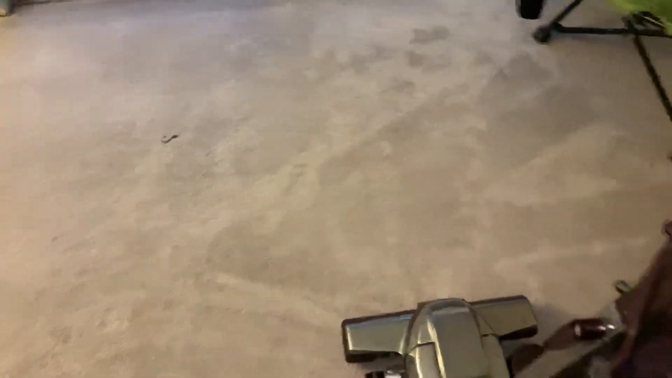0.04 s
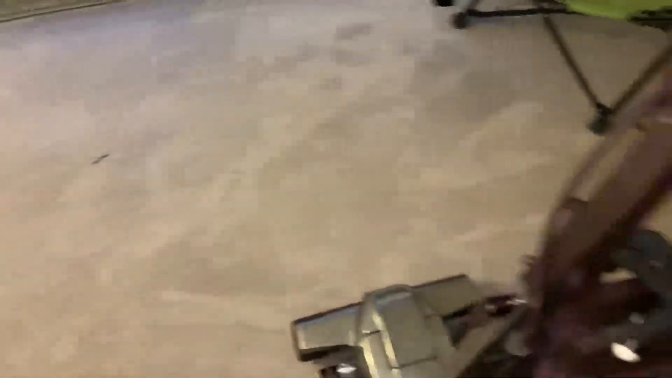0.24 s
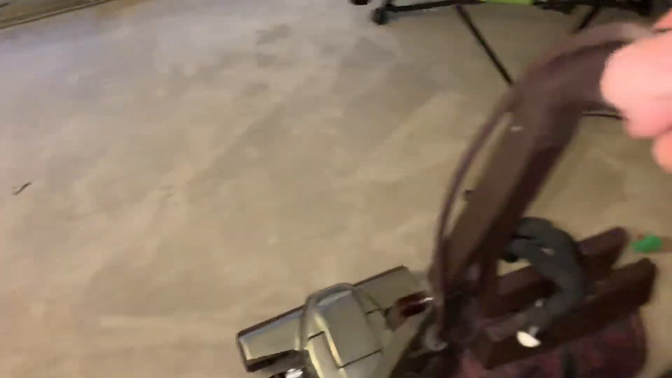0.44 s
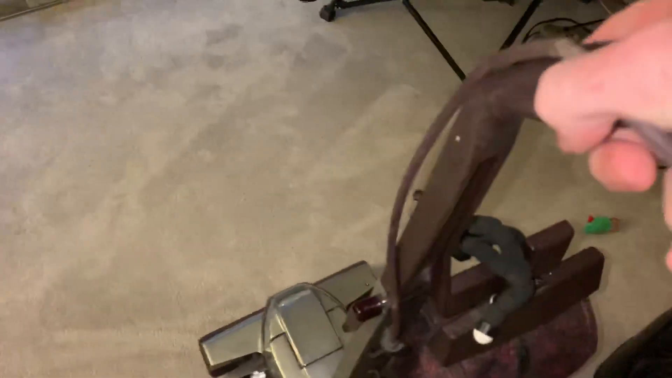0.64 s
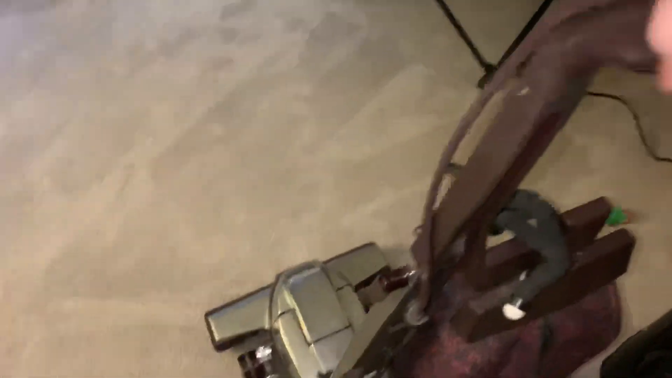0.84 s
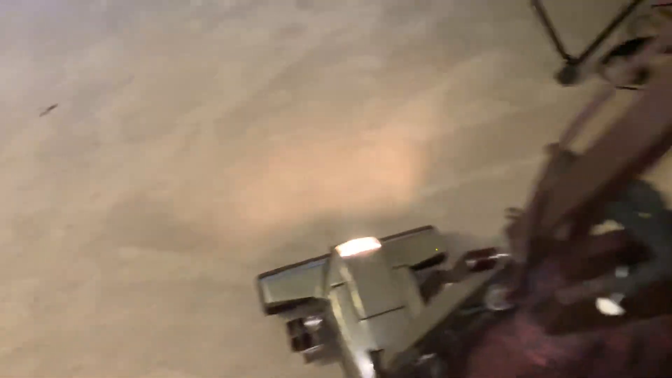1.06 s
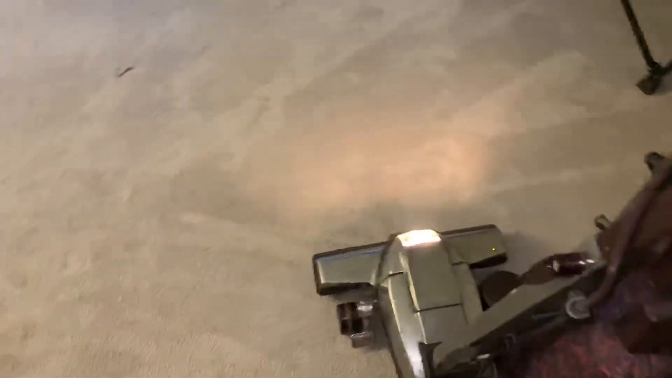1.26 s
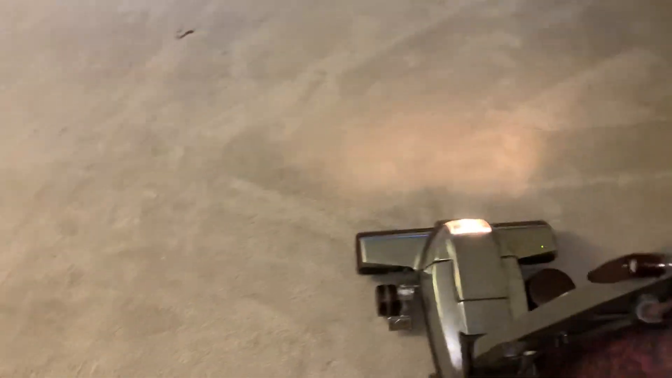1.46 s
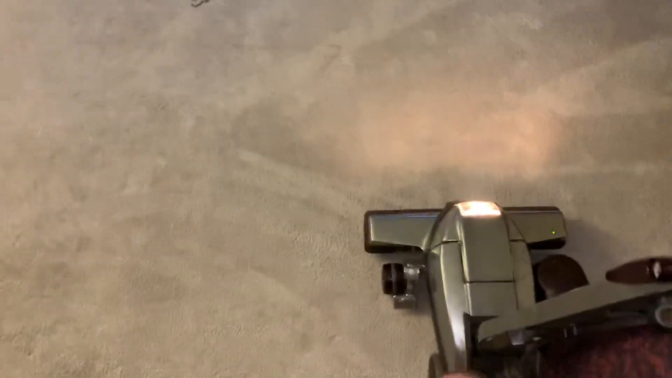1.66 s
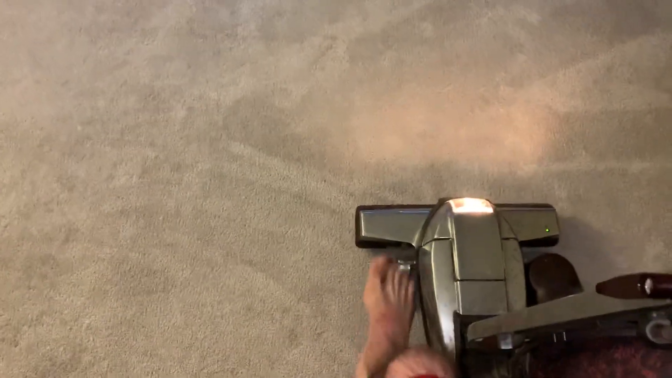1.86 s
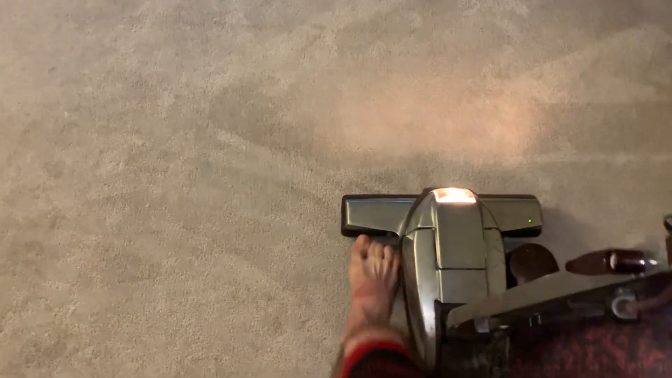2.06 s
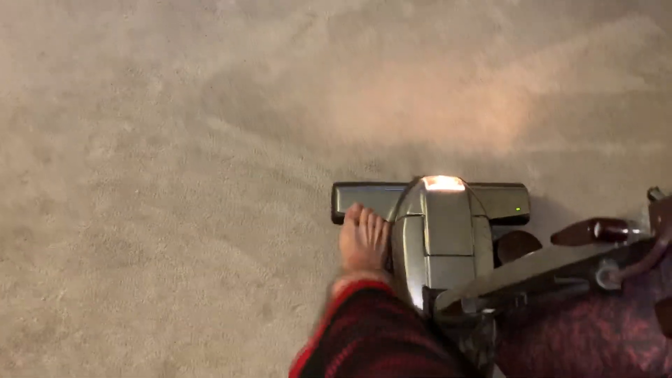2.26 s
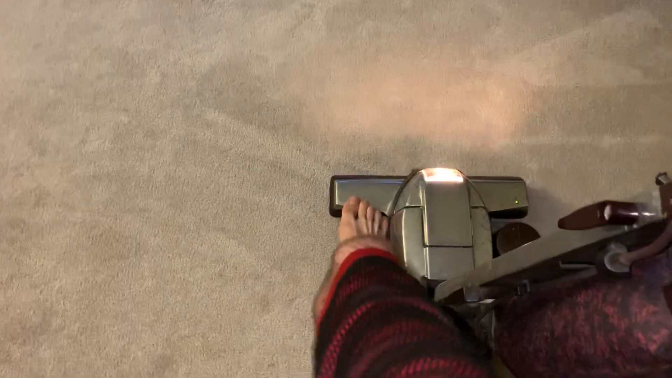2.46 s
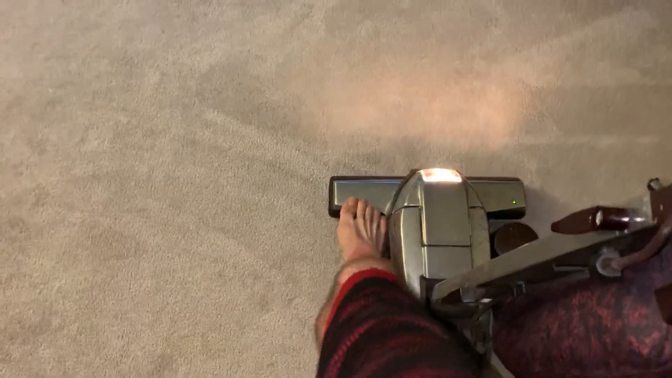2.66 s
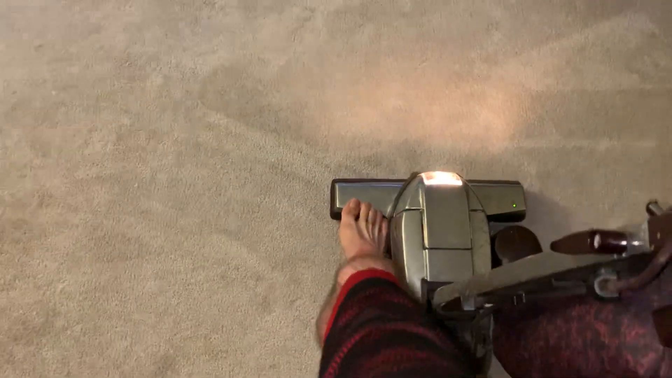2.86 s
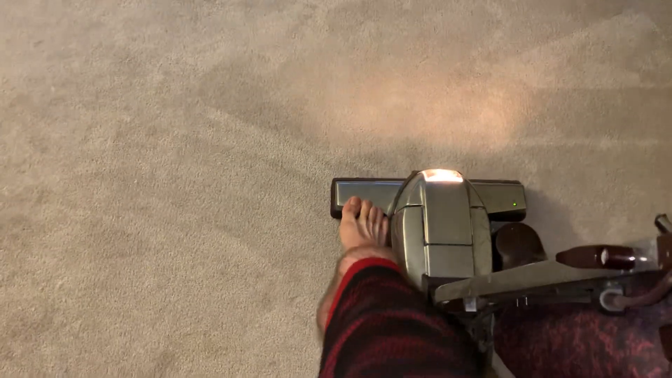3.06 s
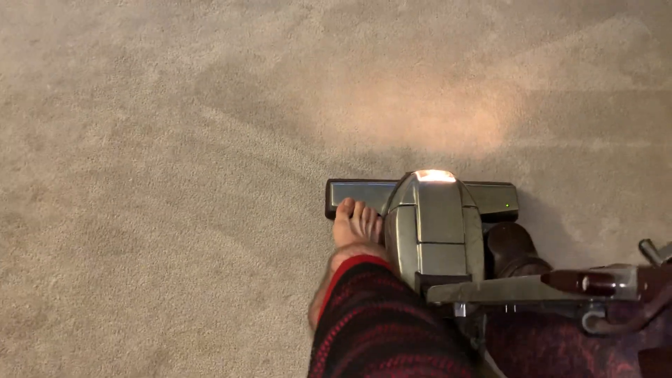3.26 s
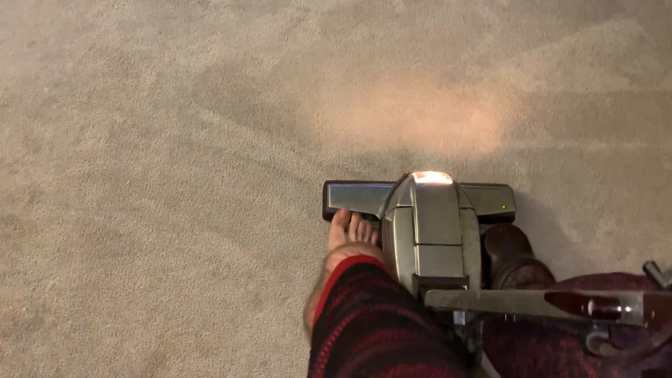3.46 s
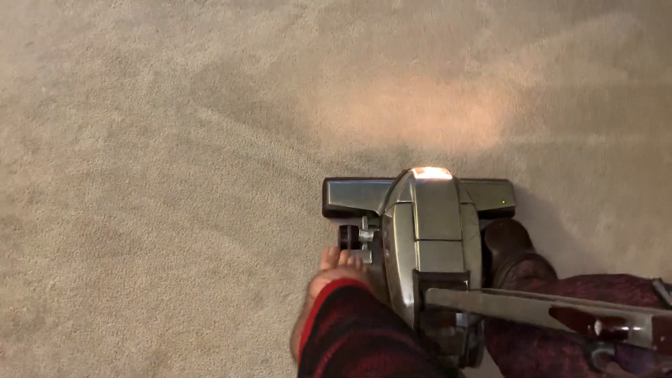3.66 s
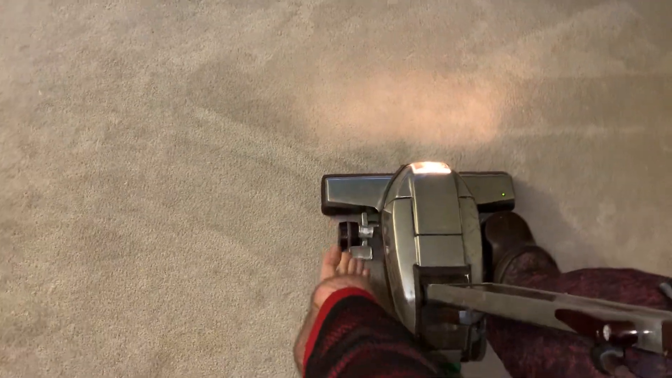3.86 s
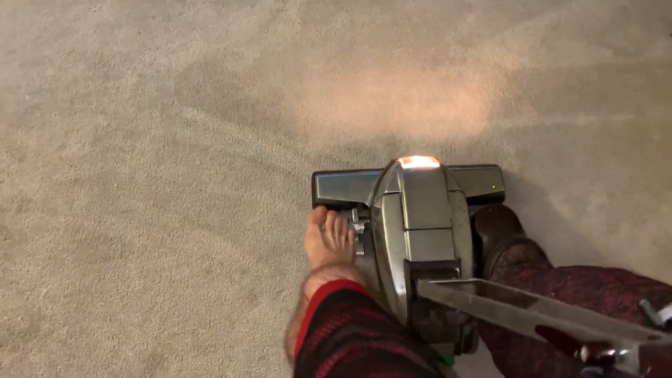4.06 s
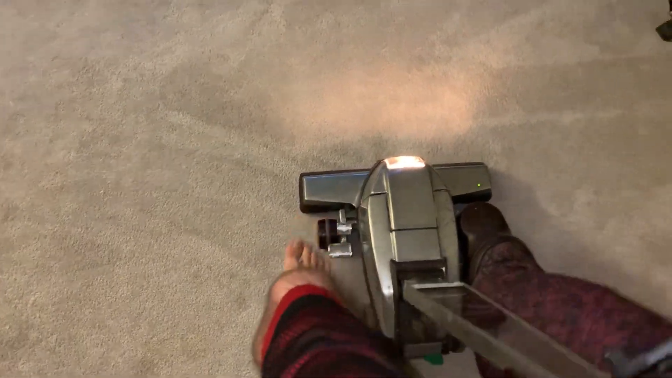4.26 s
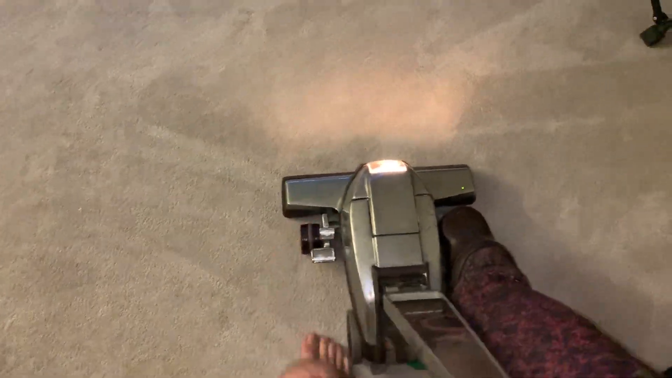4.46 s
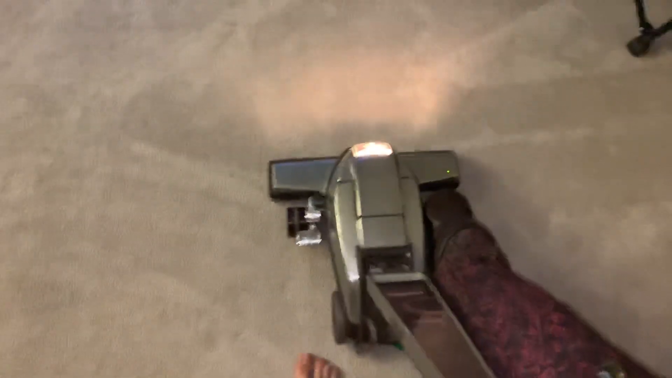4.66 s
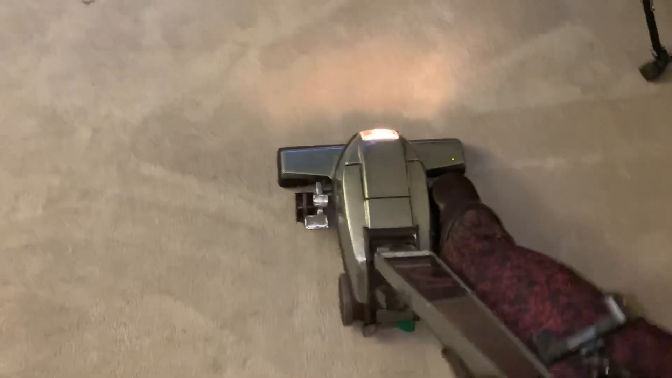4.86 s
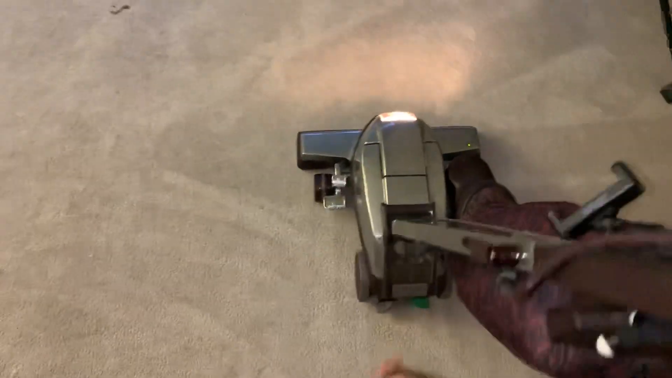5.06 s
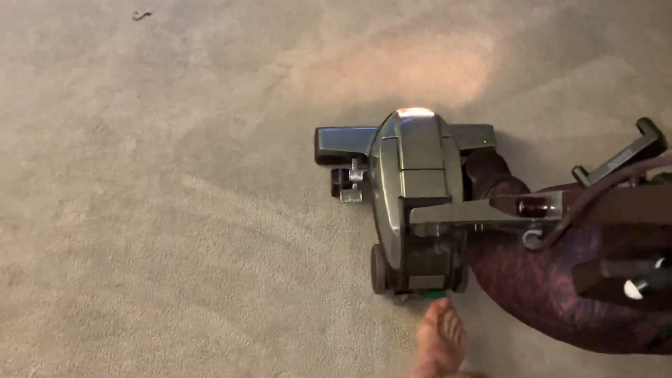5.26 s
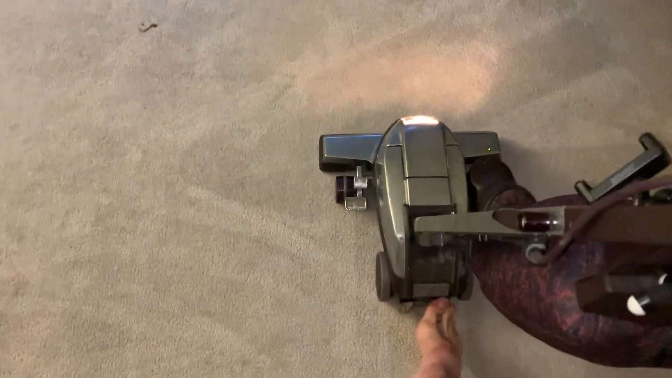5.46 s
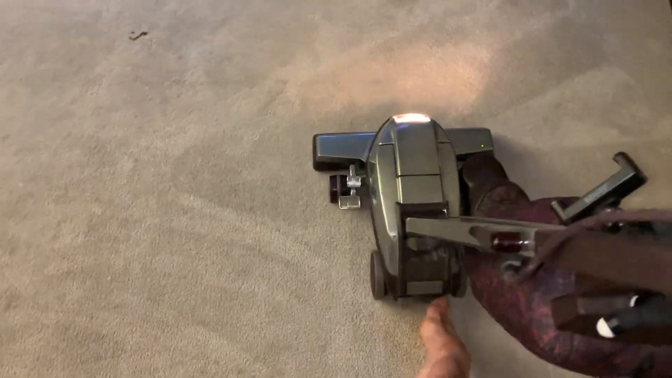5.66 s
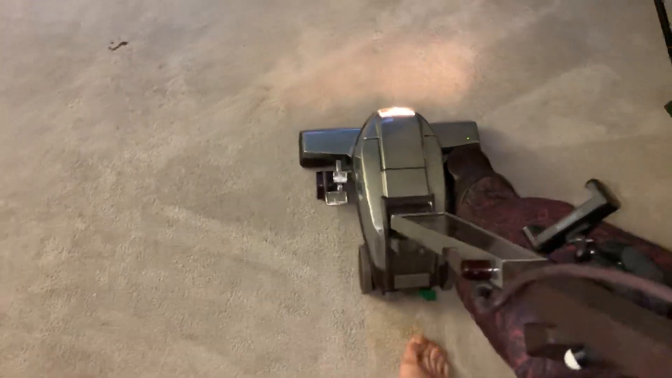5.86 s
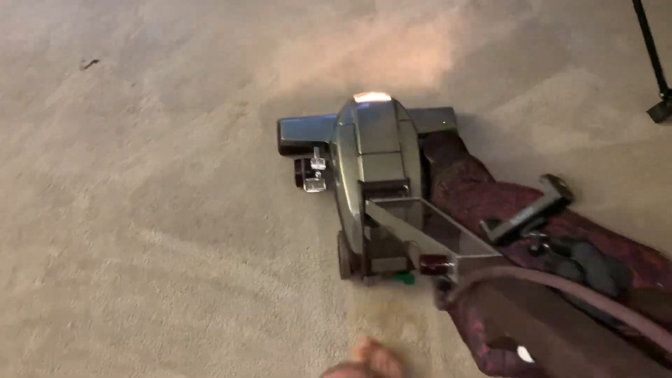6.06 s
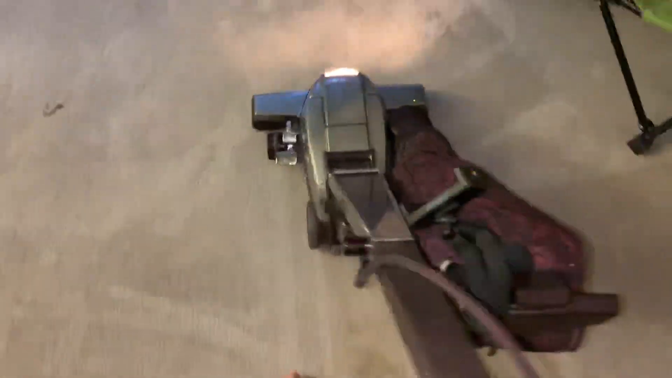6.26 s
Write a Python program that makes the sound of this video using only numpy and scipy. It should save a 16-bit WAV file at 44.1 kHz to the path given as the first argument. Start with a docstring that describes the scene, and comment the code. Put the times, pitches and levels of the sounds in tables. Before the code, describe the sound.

Close stereo sound indoors: gentle handling thuds over faint room rumble, then a switch click and an electric motor rising quickly to speed. Rushing air, fan whine and rough bristle beating blend into a steady roar. A foot makes two clusters of sharp, rattling clacks; the nozzle tips up and the brush roll hums freely, with shorter hums later, another double clack and renewed carpet beating.

```python
"""In a carpeted room, an upright vacuum cleaner is switched on an arm's length from the microphone.
First come soft bumps and a swish of fabric, made from filtered noise. Then the motor spins up: noise makes
the rush of air, sine waves tied to the motor speed make the fan's whine, and bursts of noise make the
belt-driven brush roll beat the carpet. The roll hums freely, as sine waves, while the nozzle is tipped up.
A foot works the pedal and the handle latch, which clack: short noise bursts with ringing plastic."""
import sys
import numpy as np
from scipy import signal
from scipy.fft import rfft, irfft, next_fast_len
from scipy.io import wavfile
from scipy.ndimage import uniform_filter1d

SR = 44100
rng = np.random.default_rng(int(sys.argv[2]) if len(sys.argv) > 2 else 0)


def to_wav(s):
    """Save 16-bit WAV."""
    ch = np.atleast_2d(s).T  # columns
    pcm = np.round(np.clip(ch, -1, 1) * 32767)  # PCM
    wavfile.write(sys.argv[1], SR, pcm.astype(np.int16))


N = 278271
TIME = np.arange(N) / SR  # seconds
FREQ = np.maximum(np.arange(N // 2 + 1) * SR / N, 1)  # Hz, kept above zero for the logarithm

SWITCH_ON_S, SPIN_UP_S = 0.938, .226  # moment of switching on, time constant of the run-up
BLADES, MAINS_HZ = 11, 60  # fan blades, mains frequency

# resonances and dips of the housing and its ducts: (centre [Hz], width [Hz], lift [dB])
HOUSING_MODES = [(175.4, 11.6, 0), (253, 37, -3), (300, 17, 1.5), (337.7, 10.3, -7.5), (470, 22, -3),
                 (499, 15, 5.5), (527, 9.5, 2), (570, 28, 6), (614, 25, -3.5), (679, 35, 3), (749, 27, -6),
                 (786, 39, 6.5), (942, 26, 7.5), (1081, 51, 8.5), (1201, 45, 7.5), (1585, 49, 7.5),
                 (2100, 210, 4), (2510, 90, 4.5)]
# pedal and latch clacks: (time [s], relative peak [dB], body below the treble [dB], crack decay [s],
# rebound delay [s], rebound [dB], floor shudder [dB], ring pitch [Hz], ring [dB], ring decay [s]);
# the body column is added to the peak, so a negative value makes the body weaker
PEDAL_CLACKS = [(2.374, -2, 3, 0.0038, .012, -10, -34, 4400, -17, 0.013),
                (2.4786, -.5, -1.5, 0.0039, 0.014, -11, -47, 8200, -24, 0.018),
                (2.589, -3.5, -1, 0.0052, 0.013, -9, -37, 5390, -19, 0.016),
                (2.982, -5.5, -0.5, .0035, .011, -7, -45, 5160, -12, 0.017),
                (3.015, -11.5, 7.5, .0026, .004, -12, -55, 8200, -18, .008),
                (3.023, -8, -2, 0.0045, .008, -6, -38, 4510, -9, .03),
                (3.1043, -7, 4.5, 0.0033, 0.011, -7, -44, 4850, -26, 0.011),
                (3.183, -15.5, 5, .003, .006, -12, -41, 3530, -12, .01),
                (3.269, -7, 3, .003, .008, -8, -39, 4950, -4.5, 0.011),
                (5.586, -10.5, -2, .0048, .004, -8, -50, 7500, -20, .02),
                (5.589, -8.5, -1, .0026, .0032, -5, -45, 4940, -21, .012)]


def undb(db):
    """Turn decibels into a gain."""
    return 10 ** (np.asarray(db) / 20)


def unit(x):
    """Scale a sound to an average (rms) level of 1."""
    return x / np.sqrt(np.mean(x ** 2))


def curves(table):
    """Draw each column of a time table as a line through its points, sample by sample."""
    seconds, *columns = np.transpose(table)
    return [np.interp(TIME, seconds, column) for column in columns]


def colour(x, points, modes=()):
    """Filter with a broad spectrum and resonant lifts; its response never starts before the sound."""
    hz, db = np.transpose(points)
    db = np.interp(np.log(FREQ), np.log(hz), db)
    for centre, width, lift in modes:
        db = db + lift / (1 + (2 * (FREQ - centre) / width) ** 2)
    # folding the cepstrum onto its first half makes the filter minimum-phase
    cepstrum = irfft(np.log(undb(db)), N)
    response = np.exp(rfft(2 * cepstrum * (np.arange(N) < N // 2)))
    return irfft(rfft(x) * response, N)


def walk(rate):
    """Wander smoothly by chance, with a spread of 1; about `rate` new values a second."""
    hold = int(SR / rate)
    steps = np.repeat(rng.standard_normal(N // hold + 1), hold)
    smooth = uniform_filter1d(uniform_filter1d(steps, hold), hold)
    return unit(smooth[:N])


def noise():
    """Make unrelated white noise for two channels."""
    return rng.standard_normal((2, N))


def fade(start, decay_s):
    """Start suddenly and die away exponentially."""
    return (TIME >= start) * np.exp(-np.abs(TIME - start) / decay_s)


def ports(pair, alike_hz, pan_db, direct_share=0.042, lag_s=0.00013):
    """Two close microphone ports hear alike bass and less alike treble; the left hears it a little later."""
    a, b = rfft(pair)
    share = np.clip(direct_share, 0, .9)
    alike = share + (1 - share) / (1 + (FREQ / alike_hz) ** 4)
    mid, side = a * np.sqrt(1 + alike), b * np.sqrt(1.01 - alike)
    lag = np.exp(-2j * np.pi * FREQ * lag_s)
    left = (mid + side) * lag * undb(pan_db / 2)
    right = (mid - side) * undb(-pan_db / 2)
    return unit(irfft(np.array([left, right]), N))


def ring(x, hz, width_hz):
    """A resonance whose centre may move: shift it down to zero, smooth, shift back up."""
    spin = np.exp(2j * np.pi * np.cumsum(hz) / SR)
    smooth = signal.lfilter([1], [1, -np.exp(-np.pi * width_hz / SR)], x / spin)
    return unit(np.real(smooth * spin))


def reflections(pair, lean, echo_db=-12, count=6):
    """Floor and wall echoes comb the sound; their paths sway, and shift as the handle moves."""
    out = pair
    for delay_s, shift_s in rng.uniform([.002, -.0005], [.016, .0005], (count, 2)):
        path = TIME - delay_s - shift_s * lean - .0002 * walk(1.2)
        echo = np.array([np.interp(path, TIME, x) for x in pair])
        out = out + undb(echo_db) * echo
    return unit(out)


def flutter(pair, depth_db, rate, count=14):
    """Eddies make each band of the rush flicker on its own."""
    size = next_fast_len(N)
    spectrum, out = rfft(pair, size), 0
    hz = np.linspace(1, SR / 2, spectrum.shape[1])
    place = np.interp(np.log(hz), np.log([700, 12000]), [0, count - 1])
    for k in range(count):
        # triangular bands overlap, so together they add up to the whole sound
        band = irfft(spectrum * np.maximum(1 - np.abs(place - k), 0), size)[:, :N]
        out = out + band * undb(depth_db * walk(rate))
    return unit(out)


def quiet_room():
    """The room's steady background is noise, strongest in the bass."""
    # spectrum of the room: (frequency [Hz], relative level [dB])
    room_spectrum = [(15, -34), (25, 3), (349, -3.5), (615, -18), (1090, -18.5), (1640, -35), (4160, -40),
                     (4990, -42), (9270, -46), (12000, -40), (15600, -65), (22000, -120)]
    return ports(colour(noise(), room_spectrum), alike_hz=694, pan_db=-2) * undb(-56.5)


def handling(rustle_db=-65):
    """Soft bumps are brief low-pitched noises; fabric swishes briefly as the handle is taken."""
    # bumps as the machine is handled: (time [s], level [dB], pitch [Hz], decay [s])
    bumps = [(0.068, -39.5, 120, 0.034), (0.155, -63, 900, 0.025), (0.18, -62, 160, .03),
             (0.685, -61, 1000, 0.024), (0.70, -54, 220, 0.022), (0.752, -40.5, 94, 0.02),
             (0.796, -51, 200, .04)]
    # spectrum of the fabric: (frequency [Hz], relative level [dB])
    fabric_spectrum = [(1500, -35), (3000, -16), (3850, 0), (4900, -8), (5800, -26), (12000, -40)]
    out = 0
    for s, db, hz, decay_s in bumps:
        push = fade(s, decay_s)
        thud_spectrum = [(hz / 4, -20), (hz, 0), (hz * 2, -14), (hz * 12, -70)]
        thud = colour(rng.standard_normal(N) * push, thud_spectrum)
        out = out + unit(thud) * np.sqrt(np.mean(push ** 2)) * undb(db)
    swish = curves([(.25, 0), (.36, 0.52), (.43, 0.29), (.6, 0)])[0]
    swish = swish * undb(2.1 * walk(118))
    return out + unit(colour(noise(), fabric_spectrum)) * swish * undb(rustle_db)


def starting_growl(turns, growl_db=-29.0, decay_s=0.078):
    """The switch snaps, the inrush current thumps, and the rising fan tone rings the housing in passing."""
    # modes of the motor housing: (centre [Hz], width [Hz], peak before a 2.5 dB lift [dB])
    motor_modes = [(712, 12, -28), (1094, 37, -38), (1800, 22, -30.5), (2050, 17, -34)]
    mains = np.abs(np.sin(2 * np.pi * MAINS_HZ * TIME))
    buzz = colour(noise() * mains, [(100, -18), (230, -16), (340, 6), (500, -0.5), (650, -4), (1200, -9),
                                    (1750, -3), (3000, -37), (14000, -50)])
    growl = ports(buzz, alike_hz=1024, pan_db=-1) * undb(growl_db) * fade(SWITCH_ON_S, decay_s)
    snap = colour(noise(), [(150, -19), (500, 3), (1700, -6), (3000, -12), (14000, -19)])
    click = unit(snap) * undb(-34) * fade(SWITCH_ON_S, 0.01)
    # the sweep is the fan tone at twice the blade rate
    sweep = np.sin(4 * np.pi * BLADES * turns + 1.3 * walk(300)) * fade(SWITCH_ON_S, .15)
    groan = 0
    for hz, width_hz, db in motor_modes:
        mode = ring(sweep, np.full(N, hz), width_hz)
        groan = groan + mode / np.abs(mode).max() * undb(db + 2.5)
    return growl + groan + click


def airflow(turns, flow_db, hiss_db, lean, chop=0.13, duct_db=-19):
    """Rushing air flickers and rings the ducts, chopped once a shaft turn; finer hiss comes from the nozzle."""
    # spectra of the rush and of the hiss: (frequency [Hz], relative level [dB])
    rush_spectrum = [(25, -26.5), (70, -18), (100, -18), (170, 2.5), (400, 2), (800, -4.5), (1050, -12),
                     (1350, -11), (2300, -9.5), (3200, -14), (4700, -15.5), (6000, -22.5), (15000, -73)]
    hiss_spectrum = [(3000, -17), (6200, -0.5), (7100, 3.5), (9500, -1.5), (11500, -2), (13000, -11),
                     (14000, -0.5), (14700, -25), (16000, -13.5)]
    rush = noise() * (1 + chop * np.cos(2 * np.pi * turns)) * undb(.5 * walk(14))
    rush = ports(colour(rush, rush_spectrum, HOUSING_MODES), alike_hz=1090, pan_db=-1.5, direct_share=0.11)
    # this duct resonance climbs and grows as the handle is lowered
    duct_hz = 2300 + 400 * lean
    duct = ring(noise(), duct_hz, width_hz=670) * lean * undb(duct_db)
    rush = flutter(reflections(rush + duct, lean), depth_db=2.0, rate=26)
    hiss = colour(noise() * undb(1.0 * walk(26.98)), hiss_spectrum)
    hiss = ports(hiss, alike_hz=900, pan_db=0.0, direct_share=1.0, lag_s=0.000263)
    hiss = reflections(hiss, lean, echo_db=-9, count=3)
    return rush * undb(flow_db) + hiss * undb(hiss_db)


def brush_beating(roll, contact_db, stall, scrub=1.84, dull_db=15):
    """Two rows of bristles strike the pile each turn and sometimes snag; slow strokes ring the air pocket."""
    # spectrum of the beaten carpet: (frequency [Hz], relative level [dB])
    carpet_spectrum = [(50, -59.5), (105, -20), (170, -6.5), (205, -7), (250, -11.5), (315, -1),
                       (380, -2.5), (450, -2.5), (520, -3.5), (620, -6.5), (760, -7.5), (950, -21),
                       (1400, -24), (2500, -57), (8000, -61)]
    # the bristles snag in the pile: (time [s], extra force [dB])
    snags = [(1.117, 1.5), (1.187, 3), (1.233, 3.5), (1.302, 4.5), (1.340, 0.5), (1.370, 4), (1.394, 4),
             (1.78, 7.5), (2.755, 1.5), (2.842, 2.5), (2.962, 3)]
    # the air pocket under the nozzle rings higher as the nozzle is tipped:
    # (time [s], pitch [Hz], level against the body at full speed [dB])
    air_pocket = [(1.1, 322, -10.5), (1.4, 352, -5.5), (2.9, 363, -9.5), (3.2, 308, -8), (3.9, 374, -19),
                  (4.5, 403, -11.5), (5.3, 430, -2.5), (5.65, 440, -13), (5.95, 438, 2), (6.3, 430, -6.5)]
    scatter_db, slap_turns, snag_s = 2.4, .15, 0.0064  # chance in force, decay of a slap, half length of a snag
    pocket_slow_db = 16  # the pocket stands out more while the roll is slow
    strokes = 2 * roll + 0.22 * walk(60)
    stroke_number = np.abs(strokes).astype(int)
    force = undb(scatter_db * rng.standard_normal(N // 100))[stroke_number]
    # each slap dies away over steady scrubbing
    slap = force * np.exp(-(strokes % 1) / (2 * slap_turns))
    slaps = noise() * (scrub + slap) * undb(.5 * walk(16))
    snag_db = sum(db * np.exp(-((TIME - s) / snag_s) ** 2) for s, db in snags)
    slaps = slaps * undb(snag_db)
    body = ports(colour(slaps, carpet_spectrum, HOUSING_MODES), alike_hz=1100, pan_db=-3.0)
    pocket_hz, pocket_db = curves(air_pocket)
    pocket = ring(body.mean(axis=0), pocket_hz, width_hz=30.5)
    pocket = pocket * undb(pocket_db + pocket_slow_db * np.sqrt(stall))
    return unit(body * undb(-dull_db * stall) + pocket) * undb(contact_db)


def hum_level():
    """The pile damps the roll; at each lift the hum rises quickly, holds and dies away (in dB)."""
    # the nozzle is tipped clear of the pile: (time [s], length [s], hum before a 1.5 dB cut [dB])
    lifts = [(3.25, 1.21, -24.5), (4.66, .06, -31), (4.85, 0.074, -23), (5.083, 0.22, -26),
             (5.414, .05, -32), (5.868, 0.054, -32)]
    attack_s, release_s = 0.035, 0.099
    gain = undb(-35)
    for s, length_s, db in lifts:
        attack = 1 - np.exp(-np.maximum(TIME - s, 0) / attack_s)
        release = np.exp(-np.maximum(TIME - s - length_s, 0) / release_s)
        gain = gain + undb(db) * attack * release
    return 20 * np.log10(gain)


def roll_hum(roll, hum_db, run_up):
    """The roll hums at two beats a turn, with wavering overtones; the force grows steeply with speed."""
    # overtones of the brush roll: (multiple of its turn, level before a 3 dB lift [dB])
    roll_overtones = [(3, -46), (5, -37.5), (6, -32), (7, -35), (8, -38.5), (15, -50), (17, -47)]
    hum = np.sin(4 * np.pi * roll + 0.82 * walk(12)) * undb(hum_db - 1.5 + 1.6 * walk(20))
    # the hum's own octave
    hum = hum + np.sin(8 * np.pi * roll + .3 * walk(10)) * undb(hum_db - 6 + 0.85 * walk(8))
    for order, db in roll_overtones:
        overtone = np.sin(2 * np.pi * order * roll + 0.24 * walk(12))
        hum = hum + overtone * undb(db + 3.0 + 2.9 * walk(8.2))
    left_right_db = np.array([[-.8], [.8]])
    return hum * run_up ** 8 * undb(left_right_db)


def tone_level(rest_db, order):
    """A fan tone has a resting level plus bell-shaped swells (in dB)."""
    # a tone swells and fades as the machine turns:
    # (time of the peak [s], half length [s], multiple of the blade rate, level [dB])
    swells = [(1.38, 0.052, 1, -39), (1.9, .08, 2, -43), (1.91, 0.23, 6, -45), (2.63, 0.12, 1, -34.5),
              (4.04, .08, 2, -41), (4.62, .1, 2, -33), (4.964, 0.094, 2, -40.5), (5.46, 0.073, 2, -38),
              (5.3, 0.39, 1, -49)]
    gain = undb(rest_db)
    for s, half_s, multiple, db in swells:
        if round(multiple) == order:
            gain = gain + undb(db) * np.exp(-((TIME - s) / half_s) ** 2)
    return 20 * np.log10(gain)


def fan_whine(turns, run_up):
    """Blade and motor-brush tones waver at each port; the top whistle throbs with the mains half-waves."""
    # fan and commutator (motor-brush) tones: (multiple of the shaft turn, level before a 0.5 dB cut [dB])
    fan_tones = [(1, -35), (2, -44.5), (12, -50), (33, -49), (39, -47), (47, -71), (51, -43)]
    # blade octave between its swells, once run up and before wavering: (time [s], level [dB])
    octave_rest = [(1.05, -43), (1.2, -46), (1.35, -45), (1.55, -33), (2.2, -44), (2.8, -46), (3.1, -56),
                   (3.45, -43.5), (3.7, -44.5), (4.2, -40), (4.45, -37.5), (4.8, -39.5), (5.4, -40),
                   (6.0, -39.5), (6.3, -39)]
    # side tones one mains throb below and above the octave, before wavering:
    # (time [s], lower level [dB], upper level [dB])
    side_tones = [(1.3, -48, -64), (1.7, -38, -50), (2.3, -51, -52), (2.75, -51, -43), (3.15, -48, -52),
                  (3.5, -48, -45), (4.0, -58, -58), (4.62, -48, -39), (4.95, -53, -50), (5.15, -52, -44),
                  (5.5, -59, -51), (6.0, -41, -47)]
    octave_stall_db, whine_waver_db = 11, 2.8  # loss of the octave's rest at standstill, wavering of the whine
    ripple_db, ripple_hz = 3.5, 135  # depth of the room's peaks and nulls, distance between peaks
    throb_depth = 0.55  # 0 to 1
    blade_db = tone_level(-40, order=1)
    octave_db = tone_level(curves(octave_rest)[0] - octave_stall_db * (1 - run_up), order=2)
    whistle_db = tone_level(-59, order=6)
    # the rising whine passes through the room's peaks and nulls
    octave_hz = 2 * BLADES * SR * np.gradient(turns)
    rising = np.minimum(50 * (1 - run_up), 1)
    octave_db = octave_db + ripple_db * np.sin(2 * np.pi * octave_hz / ripple_hz) * rising
    lower_db, upper_db = curves(side_tones)
    throb = 4 * np.pi * MAINS_HZ * TIME
    # the rotor judders while it accelerates, which blurs the rising glide
    judder = .025 * np.sqrt(1 - run_up) * walk(130)
    blades = 2 * np.pi * BLADES * (turns + 0.0084 * walk(7.7) + judder)
    cluster = [(-1, lower_db), (0, octave_db), (1, upper_db), (2, upper_db - 8)]  # (throbs away, dB)
    out = []
    for pan_db in (2, -1.5):  # left port, right port
        mains = 1 + throb_depth * np.cos(throb + 0.32 * walk(6))
        octave = 2 * blades + 0.82 * walk(25)
        whine = 0
        for side, db in cluster:
            whine = whine + np.sin(octave + side * throb) * undb(db + pan_db + whine_waver_db * walk(20))
        blade_tone = np.sin(blades + 0.21 * walk(13)) * undb(blade_db + 0.53 * walk(9.3))
        whistle = np.sin(6 * blades + .5 * walk(25)) * mains * undb(whistle_db + 2 * walk(10))
        whine = whine + blade_tone * run_up + whistle * run_up ** 4
        for order, db in fan_tones:
            tone = np.sin(2 * np.pi * order * turns + 1.13 * walk(22))
            whine = whine + tone * undb(db - 0.5 + 2 * walk(4.38)) * run_up ** 20
        out.append(whine)
    return np.array(out)


def latch_ringing():
    """Every blow rings the plastic's modes in its own mixture, and one part rings at its own pitch."""
    # modes of the pedal and latch, before chance: (pitch [Hz], decay [s], level against the blow [dB])
    latch_modes = [(2310, .009, -19), (2830, 0.014, -23), (4180, 0.011, -22), (4400, .011, -37),
                   (5850, 0.013, -20.5), (6560, .009, -28), (8400, 0.0078, -20), (10850, .008, -18)]
    scatter_db, detune = 5, .02  # largest chance change in level, and in pitch as a fraction
    out, t = np.zeros(N), np.arange(SR // 5) / SR
    for s, db, *_, ring_hz, ring_db, ring_s in PEDAL_CLACKS:
        # each blow lands elsewhere and rings the modes differently
        chance = rng.uniform(-0.97, 1, (len(latch_modes), 2))
        modes = [(ring_hz, ring_s, ring_db)]
        for (hz, decay_s, mode_db), (a, b) in zip(latch_modes, chance):
            modes.append((hz * (1 + detune * a), decay_s, mode_db + scatter_db * b))
        start = int(s * SR)
        for hz, decay_s, mode_db in modes:
            tone = np.exp(-t / decay_s) * np.sin(2 * np.pi * hz * t)
            out[start:start + len(t)] += undb(db + mode_db) * tone
    return out


def pedal(tail_s=0.044, tail_db=-14, soft_db=-7.0, clack_db=-6.0, ringing_db=-8, shudder_db=2, body_hz=5500):
    """A clack is a crack, a duller rebound and a rattling tail; the part rings and the floor shudders."""
    # spectrum of a clack: (frequency [Hz], relative level [dB])
    clack_spectrum = [(200, -12), (900, 14.5), (2000, -3), (3000, -2.5), (4500, 1), (6200, -1.5),
                      (7700, -2.5), (8500, -8), (12000, -1.5), (13000, -9), (16000, -8)]
    # resonances of the plastic pedal and latch: (centre [Hz], width [Hz], lift [dB])
    plastic_modes = [(2420, 490, 13), (3550, 160, -6), (4950, 1100, 4.5), (8080, 290, 8.5), (8600, 190, 22),
                     (10830, 1100, 7)]
    crack = body = shudder = 0
    rattle, tremble = undb(4.5 * walk(450)), undb(2 * walk(260))
    for s, db, body_db, crack_s, rebound_s, rebound_db, floor_db, *_ in PEDAL_CLACKS:
        first = fade(s, crack_s)
        rebound = undb(rebound_db) * fade(s + rebound_s, crack_s)
        after = rebound + undb(tail_db) * fade(s, tail_s) * rattle
        # the treble is softer after the first crack, the body is not
        crack = crack + undb(db) * (first + undb(soft_db) * after)
        body = body + undb(db + body_db) * (first + after)
        shudder = shudder + undb(floor_db) * fade(s, 0.094)
    grit = noise()
    dull = signal.sosfiltfilt(signal.butter(2, body_hz, fs=SR, output="sos"), grit)
    # smoothing over 60 samples rounds the sudden starts
    blows = (grit - dull) * uniform_filter1d(crack, size=60) + dull * uniform_filter1d(body, size=60)
    clack = colour(blows, clack_spectrum, plastic_modes)
    clack = ports(clack, alike_hz=1000, pan_db=0.5, direct_share=0.44, lag_s=0.000257)
    clack = clack * np.sqrt(np.mean(blows ** 2))
    low = colour(noise(), [(8, -10), (25, -6), (42, -8), (75, -8), (160, -22), (600, -69)])
    low = ports(low, alike_hz=300, pan_db=-2.0)
    ringing = np.array([latch_ringing(), latch_ringing()]) * tremble
    return clack * undb(clack_db) + ringing * undb(ringing_db) + low * shudder * undb(shudder_db)


def scene():
    """One motor speed drives fan and brush, and their levels rise with it; all sounds over the quiet room."""
    # motor speed once run up, faster while the carpet seals the nozzle: (time [s], shaft speed [Hz])
    shaft_speed = [(1.2, 221.5), (1.5, 213.6), (1.85, 213.9), (2.5, 214.8), (3.2, 215.1), (3.6, 213.6),
                   (4.6, 211.8), (5.3, 211.7), (5.6, 212.7), (5.9, 212.5), (6.3, 209.2)]
    # the handle is lowered and raised: (time [s], 0 upright to 1 low)
    handle_lean = [(1.0, 0.49), (2.1, 0.35), (3.3, 0.024), (4.1, 0.13), (4.7, 0.79), (5.1, 0.4), (6.3, 1)]
    # how hard the brush beats the carpet, once run up: (time [s], level before a 0.5 dB cut [dB])
    carpet_contact = [(1.055, -26), (1.07, -17.5), (1.3, -15), (2.7, -11), (3.08, -12), (3.33, -19),
                      (3.9, -20.5), (4.65, -20.5), (5.4, -21), (5.7, -13), (5.95, -17), (6.12, -16.5),
                      (6.3, -20.5)]
    belt_ratio = .2918  # brush turns per shaft turn
    run_up = 1 - np.exp(-np.maximum(TIME - SWITCH_ON_S, 0) / SPIN_UP_S)  # 0 standing to 1 full speed
    turns = np.cumsum(curves(shaft_speed)[0] * run_up) / SR
    roll = belt_ratio * turns
    stall, lean = (1 - run_up) ** 1.87, curves(handle_lean)[0]
    # upright level at full speed, gain with the handle low, loss at standstill, all in dB
    flow_db = -23 + 3.5 * lean - 20.5 * stall
    hiss_db = -36 + 5 * lean - 28 * stall
    contact_db = curves(carpet_contact)[0] - .5 - 25 * stall
    machine = airflow(turns, flow_db, hiss_db, lean) + brush_beating(roll, contact_db, stall)
    machine = machine + roll_hum(roll, hum_level(), run_up) + fan_whine(turns, run_up)
    machine = machine * (TIME >= SWITCH_ON_S)
    return quiet_room() + handling() + starting_growl(turns) + machine + pedal()


def record(dry):
    """The recorder rounds off the very highest peaks and cuts the top above 16 kHz."""
    rounded = dry / (1 + (dry / .95) ** 8) ** (1 / 8)
    return signal.sosfilt(signal.ellip(8, .2, 70, 16000, fs=SR, output="sos"), rounded)


dry = scene()
out = record(dry)
to_wav(out)
```